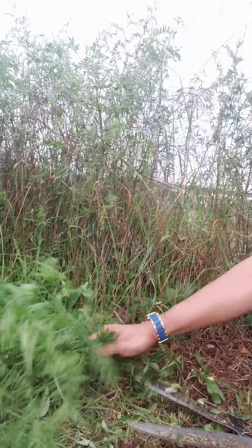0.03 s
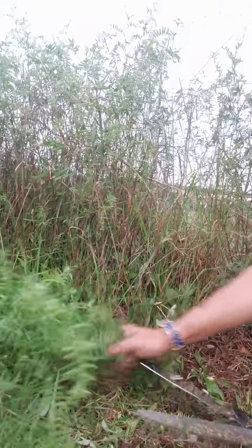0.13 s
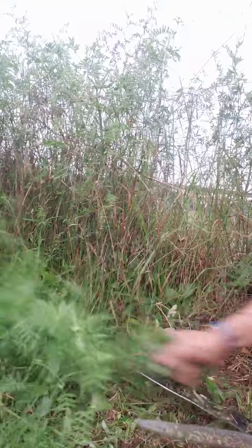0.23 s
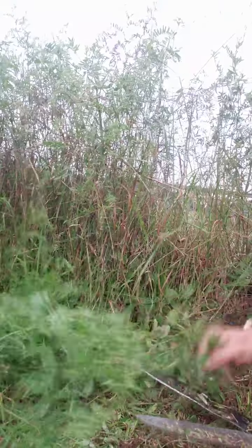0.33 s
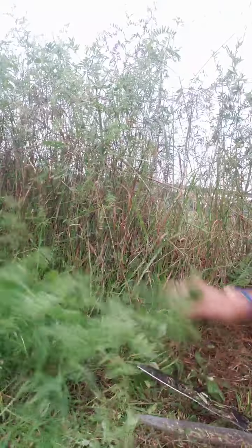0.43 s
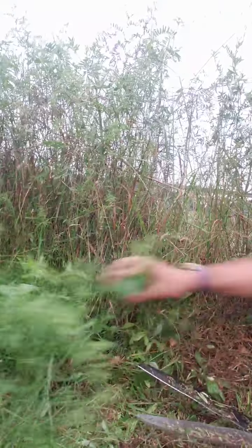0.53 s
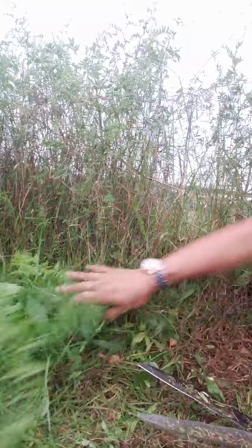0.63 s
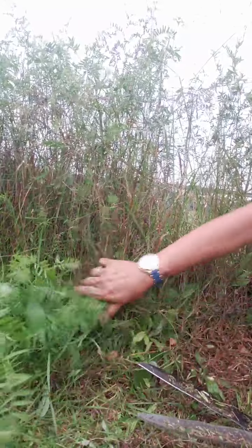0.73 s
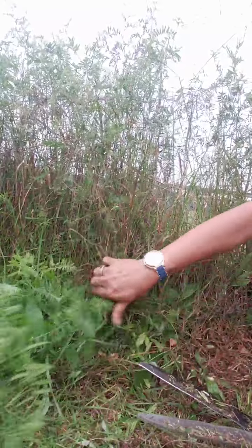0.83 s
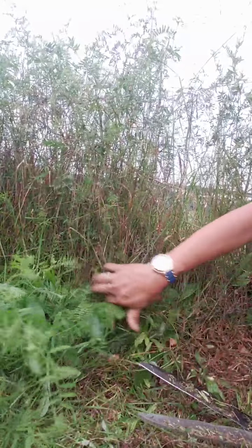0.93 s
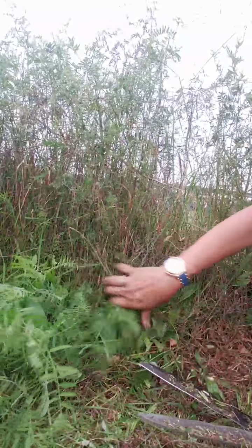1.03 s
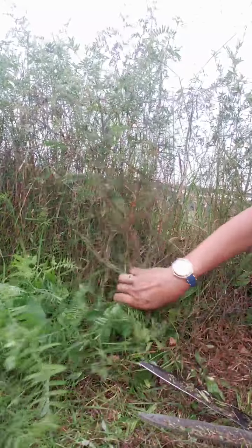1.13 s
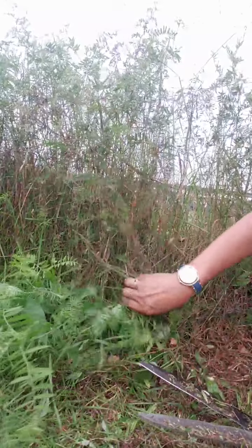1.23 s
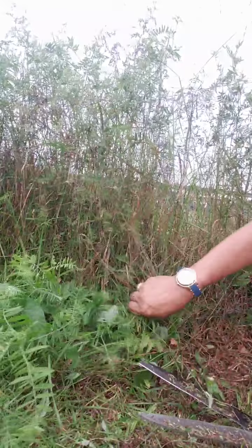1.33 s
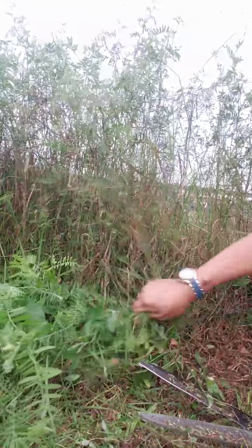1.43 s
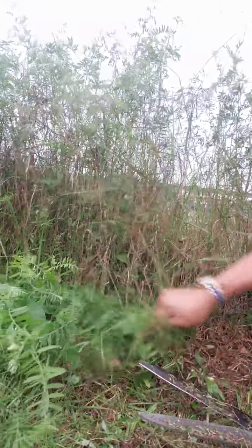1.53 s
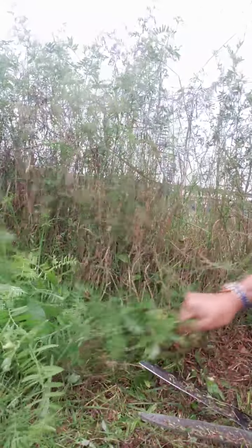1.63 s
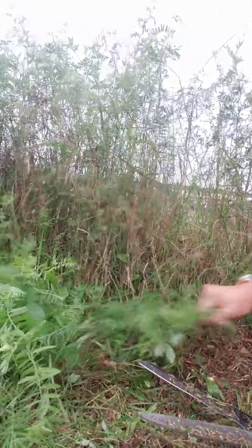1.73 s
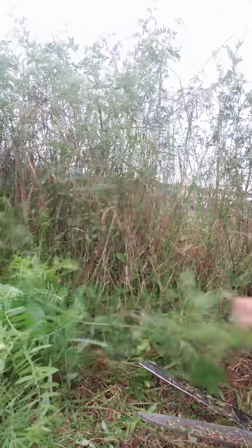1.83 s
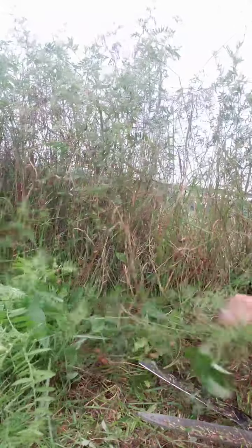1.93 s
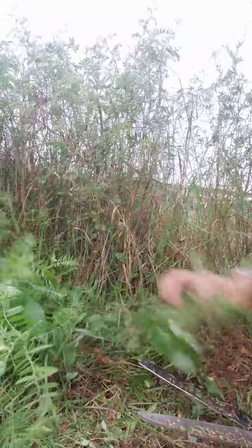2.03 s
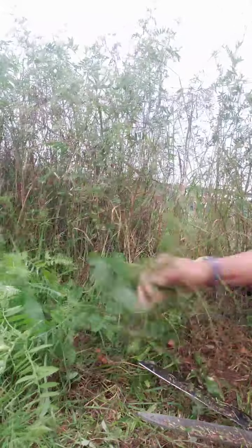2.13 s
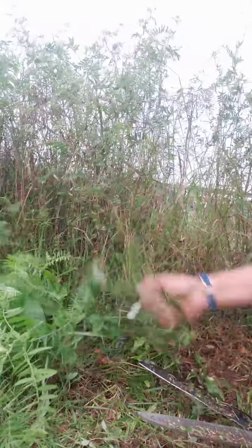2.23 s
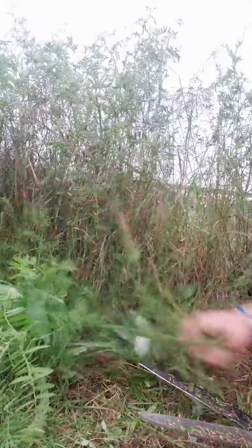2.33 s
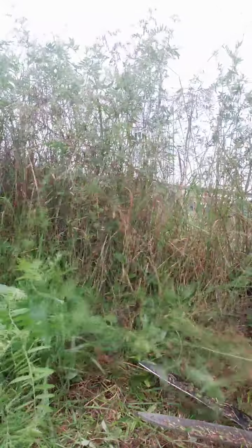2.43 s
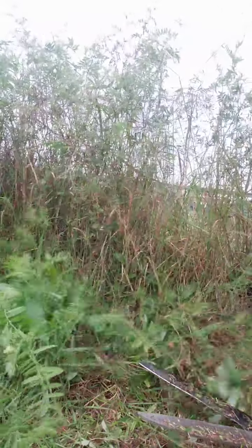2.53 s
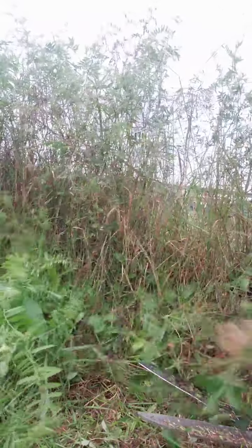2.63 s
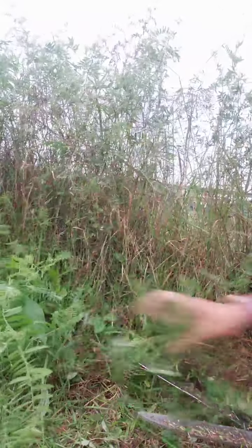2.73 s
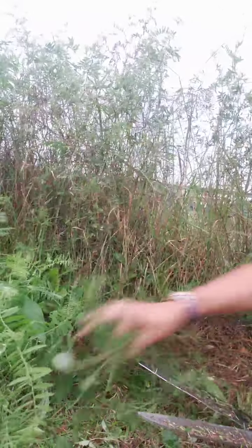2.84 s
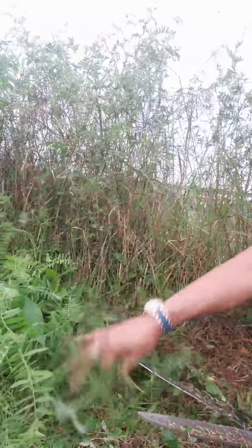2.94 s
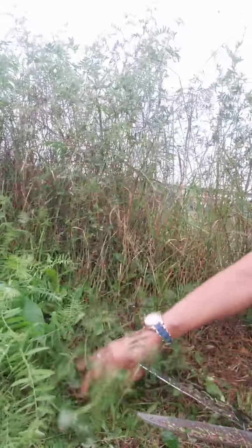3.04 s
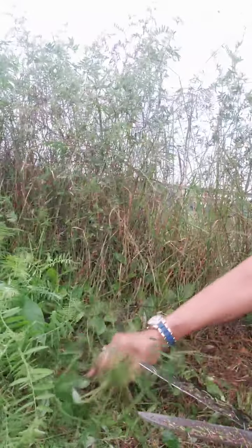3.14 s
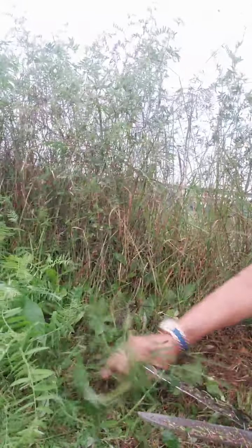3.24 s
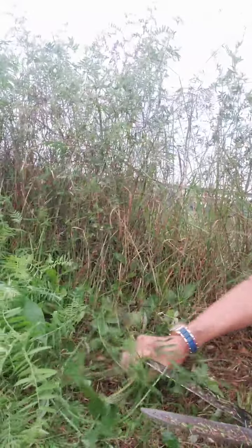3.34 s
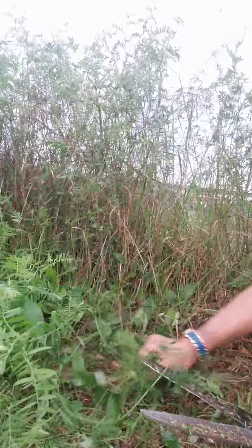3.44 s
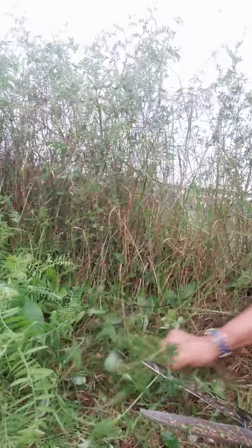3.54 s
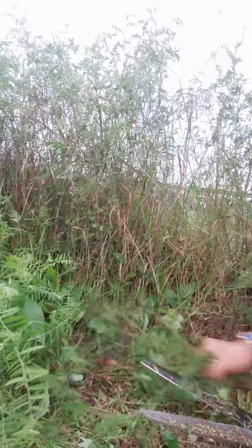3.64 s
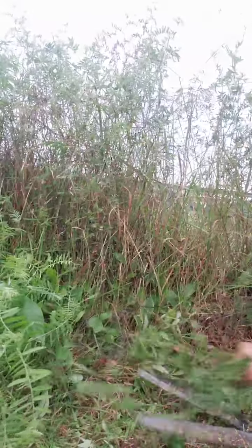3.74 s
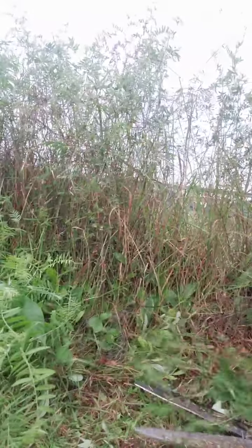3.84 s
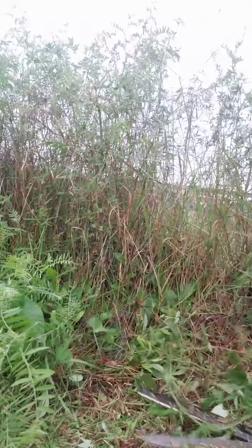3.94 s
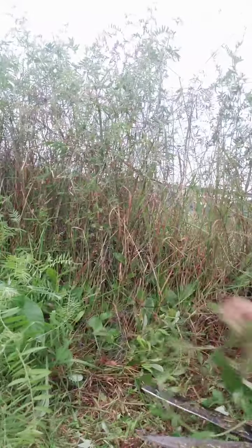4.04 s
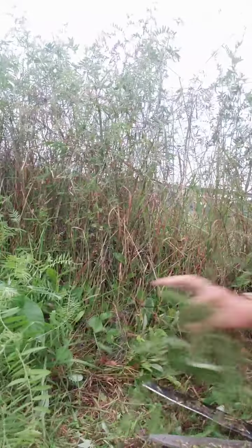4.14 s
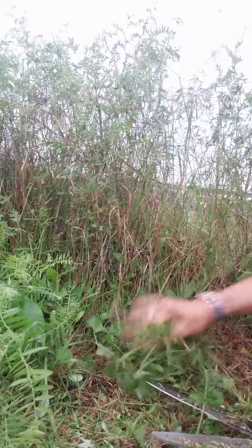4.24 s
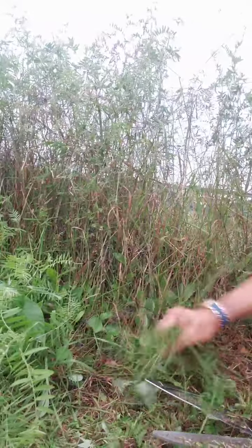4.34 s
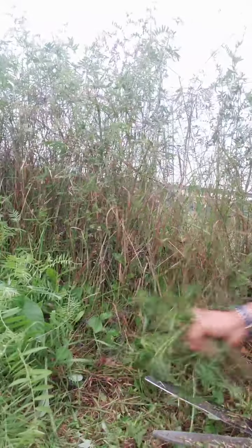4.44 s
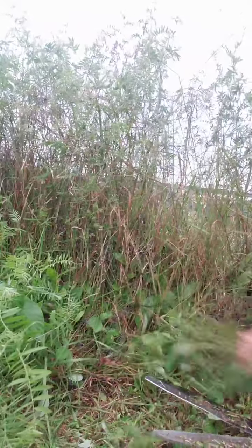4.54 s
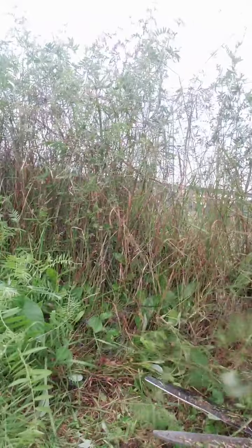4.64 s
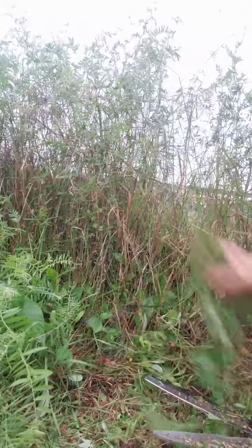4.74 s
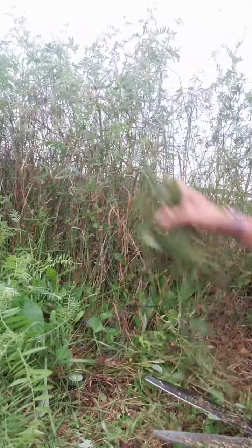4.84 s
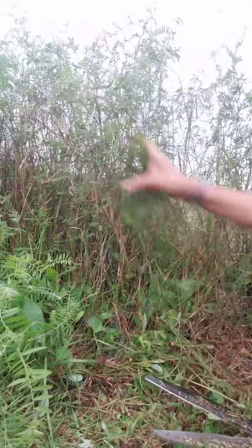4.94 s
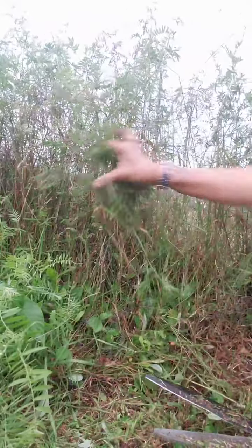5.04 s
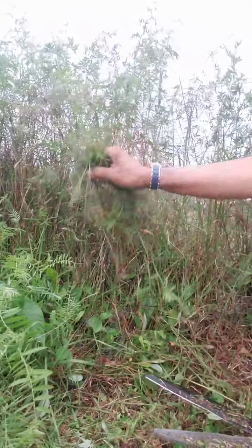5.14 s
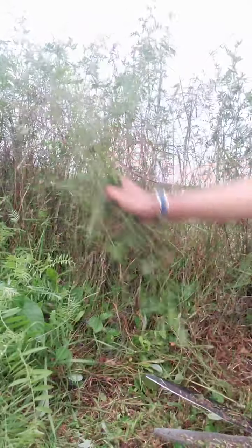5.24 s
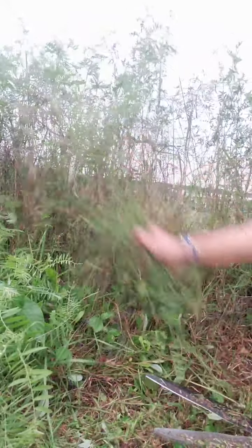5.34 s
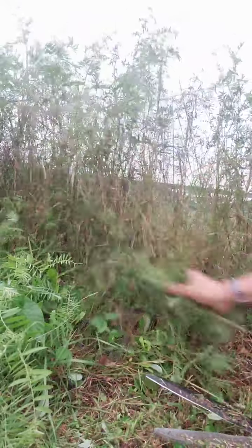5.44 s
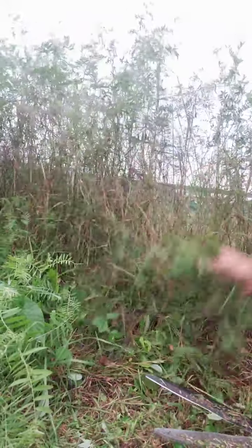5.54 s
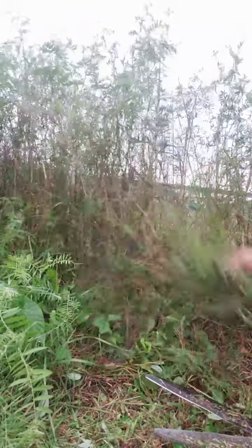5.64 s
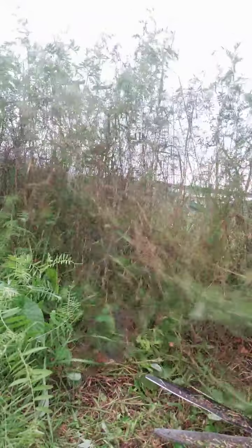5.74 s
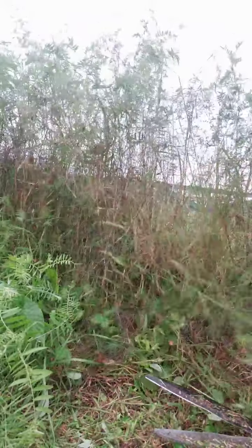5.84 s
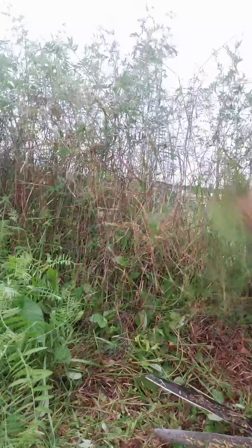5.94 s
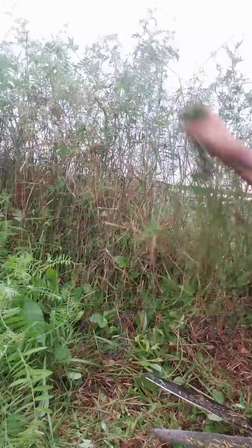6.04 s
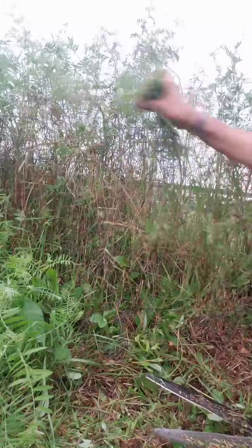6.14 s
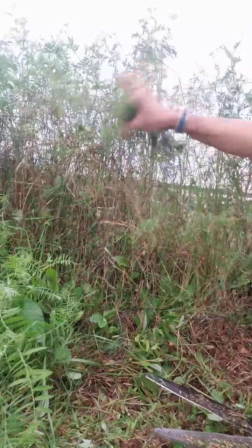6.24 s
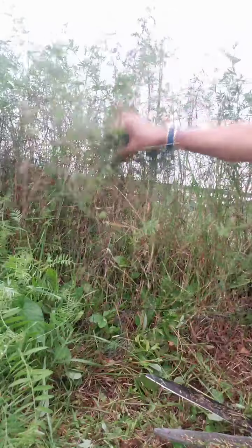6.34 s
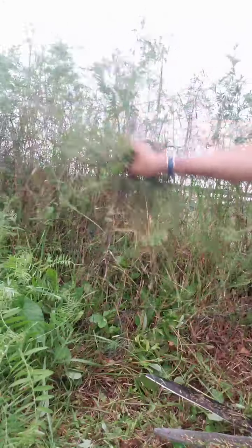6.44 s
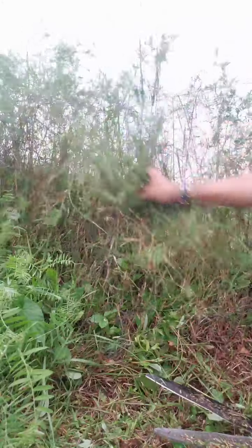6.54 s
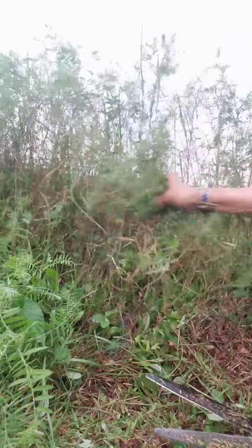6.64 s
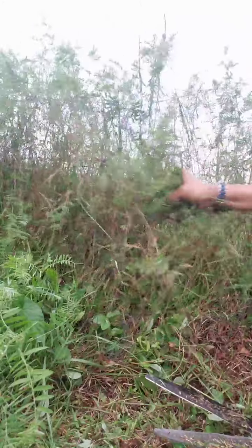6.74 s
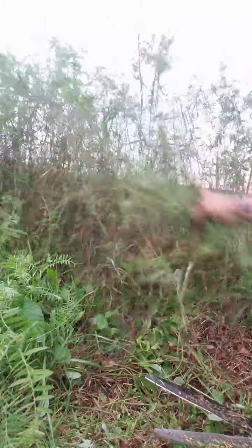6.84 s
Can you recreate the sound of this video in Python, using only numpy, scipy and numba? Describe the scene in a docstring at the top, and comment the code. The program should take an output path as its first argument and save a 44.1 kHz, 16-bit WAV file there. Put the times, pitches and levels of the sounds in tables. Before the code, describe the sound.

Weeds are ripped out by hand close to the microphone, with crisp bright leaf rustle, sharp stem snaps and short tearing bursts over faint outdoor hum.

```python
"""A hand tears weeds out of a garden bed close to a phone whose microphone makes leaves and cracks
bright in the top octave. After a moment of silence, stems snap, slip and rip over rustling leaves while
roots shake the soil. Bursts follow near 1.4-2.5, 3.3-4.0 and 4.5 s, the last with no tug; many hard snaps
come at 5.3-5.9 s, and a last tug with a slip ends it at 6.9 s. A mains hum and far traffic lie underneath.
Rustle is filtered noise grains, snaps are clicks with noise tails, slips are pulses ringing resonators."""
import sys
import numpy as np
from scipy import signal
from scipy.fft import rfft, irfft
from scipy.io import wavfile
from scipy.ndimage import uniform_filter1d
from numba import njit

SR = 44100
rng = np.random.default_rng(int(sys.argv[2]) if len(sys.argv) > 2 else 0)


def transcribe(u):
    """Save the signal u as a 16-bit wav file named by the first command-line argument.

    u: samples, shape (n,) or (channels, n), limited to [-1, 1]; the rate is SR.
    q: integer samples, one column per channel.
    """
    v = np.clip(np.atleast_2d(u).T, -1, 1)
    q = np.round(v * 32767).astype(np.int16)
    wavfile.write(sys.argv[1], SR, q)


N = 303496

# rubbing leaves as heard through a bright phone microphone with a steep top cutoff:
# freq_hz, gain_db (relative)
LEAF_COLOUR = [(2000, -64), (6000, -39.5), (8300, -35.5), (9400, -5.5), (10500, 0), (11400, 6), (14200, 7),
               (15600, 9), (15900, -51.5)]
# stalks and thin stems as heard through the microphone: freq_hz, gain_db (relative)
STALK_COLOUR = [(2000, -40.5), (3300, -18), (4300, -3.5), (5200, -6), (6100, 0.5), (7200, -6), (9000, -20)]
# ripping fibres as heard through the microphone: freq_hz, gain_db (relative)
FIBRE_COLOUR = [(400, -15.5), (1200, -14.5), (2100, -3.5), (2800, -4), (3400, -3), (6000, -36.5)]


def undb(db):
    """Amplitude ratio of a level in dB."""
    return 10 ** (np.asarray(db) / 20)


def level(x, db):
    """Scale to an RMS level in dB."""
    return x * undb(db) / np.sqrt(np.mean(x ** 2))


def peak(x, db):
    """Scale to a peak level in dB."""
    return x * undb(db) / np.abs(x).max()


def colour(x, points):
    """Causal minimum-phase filter with the given (Hz, dB) gain, from the cepstrum of the log gain."""
    hz, db = np.transpose(points)
    size = 4096
    log_grid = np.log(np.arange(size // 2 + 1) * SR / size + 1)
    gain_db = np.interp(log_grid, np.log(hz), db)
    cepstrum = irfft(np.log(undb(gain_db)), size)
    # fold onto positive time
    cepstrum[1:size // 2] *= 2
    cepstrum[size // 2 + 1:] = 0
    impulse = irfft(np.exp(rfft(cepstrum)), size)[:size // 2]
    return signal.fftconvolve(x, impulse)[:len(x)]


def walk(rate_hz):
    """Random levels held 1 / rate_hz and slewed twice; spread near 1."""
    hold = int(SR / rate_hz)
    steps = np.repeat(rng.standard_normal(N // hold + 1), hold)
    slewed = uniform_filter1d(uniform_filter1d(steps, hold), hold)
    return 1.31 * slewed[:N]


def garden():
    """Far traffic rumble and faint hiss, with a slightly wavering mains hum."""
    # rumble and hiss as heard: freq_hz, gain_db (relative)
    garden_colour = [(14, -44.5), (40, -3), (70, -2.5), (200, -8), (300, -11.5), (360, -23), (1000, -29.5),
                     (5000, -36), (8000, -54.5), (9200, -68), (10500, -69.5)]
    air_db, hum_hz, hum_db = -69.5, 119, -67
    air = level(colour(rng.standard_normal(N), garden_colour), air_db) * undb(1.0 * walk(2.85))
    cycles = hum_hz * np.cumsum(1 + .012 * walk(10)) / SR
    hum = np.sin(2 * np.pi * cycles) * undb(2.2 * walk(9))
    return air + level(hum, hum_db)


def tugs():
    """Each tug at the roots tightens fast, holds and loosens; fibre rip and soil rumble levels in dB."""
    # tugs: start_s, hold_s, fibre_rip_db, soil_rumble_db
    tug_table = [(0.161, 0.097, -66.5, -51.5), (1.42, 0.057, -80.5, -71), (1.545, .13, -69.5, -54),
                 (1.751, 0.14, -69.5, -59), (2.378, 0.021, -70, -59), (2.46, .12, -89, -67.5),
                 (3.3, 0.087, -91, -61.5), (3.415, 0.062, -73.5, -55.5), (3.52, 0.069, -78.5, -64),
                 (3.728, 0.071, -76.5, -66), (5.412, 0.093, -65.5, -63), (5.636, .03, -70.5, -64.5),
                 (5.729, 0.021, -64, -55), (6.554, 0.23, -79.5, -71), (6.86, .04, -82, -61)]
    tighten_db_per_s, loosen_db_per_s = 271, 176
    t = np.arange(N) / SR
    start, hold, fibre_db, soil_db = np.transpose(tug_table)[:, :, None]
    before_db = tighten_db_per_s * np.maximum(start - t, 0)
    after_db = loosen_db_per_s * np.maximum(t - start - hold, 0)
    slack_db = before_db + after_db
    return (fibre_db - slack_db).max(axis=0), (soil_db - slack_db).max(axis=0)


def soil(soil_db):
    """Roots shake the soil: low filtered noise that follows the tugs."""
    # soil rumble as heard: freq_hz, gain_db (relative)
    soil_colour = [(15, -41), (70, 1.5), (110, 3.5), (190, -2.5), (300, -13), (600, -23.5), (1300, -27.5),
                   (2500, -52)]
    return level(colour(rng.standard_normal(N), soil_colour), 0) * undb(soil_db)


def brushing():
    """Leaf level in dB as the hand brushes, straight lines between points."""
    # brushing of the hand: time_s, leaf_rustle_db
    brush_table = [(0.0, -51.5), (0.07, -42), (0.229, -39.5), (0.501, -59.5), (0.65, -57), (0.92, -65.5),
                   (1.36, -50), (1.639, -41.5), (1.88, -39.5), (1.95, -62.5), (2.029, -55), (2.2, -62.5),
                   (2.329, -54.5), (2.385, -44), (2.469, -49.5), (2.85, -60), (3.16, -60), (3.309, -50),
                   (3.4, -52), (3.47, -45), (3.772, -46.5), (3.888, -59), (4.0, -51.5), (4.081, -65.5),
                   (4.33, -56.5), (4.491, -44.5), (4.6, -55), (5.04, -52.5), (5.219, -54), (5.401, -43),
                   (5.61, -53.5), (5.75, -40.5), (5.88, -51), (6.168, -52), (6.299, -64), (6.53, -43),
                   (6.66, -43), (6.79, -51), (6.88, -34.5)]
    return np.interp(np.arange(N) / SR, *np.transpose(brush_table))


def stalk_scrape(leaf_db, fibre_db):
    """Stalk level in dB: scraped by the brushing hand or dragged by a tug, whichever is louder."""
    brushed_db = -74 + 1.384 * (leaf_db + 50)  # -74 dB when leaves are at -50 dB
    dragged_db = fibre_db + 5
    return np.maximum(brushed_db, dragged_db)


def grains(rate_per_s, spread_db, tail_s, bed, top_db=14):
    """Random contacts, a few louder than the rest, each a short dying puff of noise over a finer bed."""
    chance, noise = rng.random((2, N)), rng.standard_normal(N)
    excess_db = np.minimum(-spread_db * np.log(1 - chance[1]), top_db)
    hits = (chance[0] < rate_per_s / SR) * undb(excess_db) ** 2
    power = signal.lfilter([1], [1, -np.exp(-1 / (tail_s * SR))], hits)
    return noise * np.sqrt(power / power.mean() + bed)


def rustle(leaf_db, stalk_db, fibre_db):
    """Leaves, stalks and fibres rub in the same contacts, so their grains partly coincide."""
    shared = grains(260, 3.0, 0.0013, 1.0)
    patchy = undb(2.9 * walk(45))
    stalk_grains = shared + 0.63 * grains(190, 6.3, 0.0008, 0.5)
    fibre_grains = 0.33 * shared + grains(200, 1.1, 0.00081, 0.78)
    leaf = level(colour(shared, LEAF_COLOUR), 0) * undb(leaf_db)
    stalk = level(colour(stalk_grains, STALK_COLOUR), 0) * undb(stalk_db)
    fibre = level(colour(fibre_grains, FIBRE_COLOUR), 0) * undb(fibre_db)
    return patchy * (leaf + stalk + fibre)


@njit
def resonate(x, hz, sharpness):
    """State-variable band-pass whose centre moves, gain 1 at the centre."""
    y, band, low = np.empty(len(x)), 0., 0.
    for i in range(len(x)):
        g = np.tan(np.pi * hz[i] / SR)
        v = (band + g * (x[i] - low)) / (1 + g * (g + 1 / sharpness))
        band, low, y[i] = 2 * v - band, low + 2 * g * v, v / sharpness
    return y


def slips(swell=0.35, stop_s=0.0068):
    """Stick-slip of stems: uneven pulses, mostly slowing, ring gliding resonances, then stop short."""
    # stems slipping through the fingers or out of the soil:
    # start_s, end_s, start_rate_per_s, end_rate_per_s, unevenness, sharpness (Q), gain_db,
    # rings [start_hz, end_hz, ring_db (relative)]
    slip_table = [(0.1, 0.16, 350.2, 252, 0.41, 7, -69, [(2570, 2400, -5.5), (4800, 4150, -4.5)]),
                  (0.185, 0.239, 508, 306.6, 0.38, 2.5, -61, [(4550, 3700, -10), (2200, 2630, -16),
                  (940, 680, -24)]), (1.52, 1.527, 700, 600, .3, 1.5, -78.5, [(610, 380, -13)]),
                  (1.58, 1.907, 450, 160, .09, 3.5, -66.5, [(493, 420, -9), (970, 630, -6.5),
                  (1620, 1300, -7), (2320, 1600, -2), (3800, 3400, -0.5), (6100, 3660, -4)]),
                  (3.426, 3.45, 405, 406, 0.27, 5, -79.5, [(1390, 1600, -15)]),
                  (3.761, 3.792, 503, 494, 0.27, 3.9, -76, [(1940, 2000, -18.5), (810, 760, -20.5)]),
                  (3.93, 3.984, 790, 780, .05, 8, -90.5, [(2440, 2230, 3), (1520, 1440, -7.5)]),
                  (6.808, 6.882, 404.3, 404, 0.42, 2.9, -70.5, [(1350, 1300, -13.5), (2820, 2570, -13.5),
                  (700, 870, -21)])]
    broad_db, bright_db = -21.5, 3  # relative to gain_db
    out, n = np.zeros(N + SR), SR // 2
    for start, end, rate0, rate1, uneven, sharpness, gain_db, rings in slip_table:
        length_s = end - start
        noise, drift = rng.standard_normal((2, n))
        along = np.minimum(np.arange(n) / SR / length_s, 1)
        wander = 1 + uneven * uniform_filter1d(drift, size=64) * np.sqrt(64)
        rate = (rate0 + (rate1 - rate0) * along ** 4.0) * wander
        slip_count = np.floor(np.cumsum(np.maximum(rate, 0)) / SR)
        pulses = np.diff(slip_count, prepend=0) * undb(3.7 * noise) + 0.1 * noise
        pulses *= np.clip(along / swell, 0, 1)
        pulses *= np.clip((1 - along) * length_s / stop_s, 0, 1)
        ring = 0
        for hz0, hz1, ring_db in rings:
            hz = hz0 + (hz1 - hz0) * along
            rung = resonate(resonate(pulses, hz, 1. * sharpness), hz, sharpness / 2)
            ring = ring + level(rung, ring_db)
        broad = level(colour(pulses, FIBRE_COLOUR), broad_db)
        bright = level(colour(pulses, LEAF_COLOUR), bright_db)
        # RMS was set over n samples; refer it to the slip's length
        body = (ring + broad + bright) * np.sqrt(n / SR / length_s)
        at = int(start * SR)
        out[at:at + n] += undb(gain_db) * body
    return out[:N]


def twigs(leaf_db, count=36):
    """Small snaps at random moments, more often and louder where the hand brushes hard."""
    top_db, scatter_db = 12, 3  # largest crack over the leaf level; how far each level may fall short
    thick_rel_db, thin_rel_db = -30, -15  # largest knocks relative to the crack
    busy = np.cumsum(undb(2 * leaf_db))
    when, size, thick, thin = rng.random((count, 4)).T
    at = np.searchsorted(busy, when * busy[-1])
    crack_db = leaf_db[at] + top_db - scatter_db * size
    thick_db = crack_db + thick_rel_db - scatter_db * thick
    thin_db = crack_db + thin_rel_db - scatter_db * thin
    return list(zip(at / SR, crack_db, thick_db, thin_db))


def snaps(leaf_db, crack_s=.0004, fray_s=0.0048, knock_s=0.0028):
    """A sharp crack, last fibres fraying after it, and a short knock in thick and thin parts of the stem."""
    # stems snapping: time_s, crack_peak_db, thick_knock_peak_db, thin_knock_peak_db
    snap_table = [(0.0398, -30.5, -55.5, -46), (0.071, -29, -59, -44), (0.095, -29, -70, -50),
                  (0.109, -36, -62.5, -34), (0.1235, -15, -39, -36), (0.146, -16, -52, -43),
                  (0.1538, -11, -50, -51), (0.1641, -23, -39, -34.5), (0.1783, -13, -45, -42),
                  (0.1882, -22, -40, -36), (0.1955, -17.5, -45, -37), (0.2143, -16, -33.5, -38),
                  (0.2723, -16, -55, -51), (0.278, -11, -48.5, -35), (1.412, -37, -62, -56),
                  (1.4652, -28, -57.5, -44), (1.4869, -22.5, -67, -47), (1.522, -20.5, -49, -35.5),
                  (1.5928, -14, -50, -28.5), (1.6098, -22, -47, -39), (1.646, -14, -43, -38),
                  (1.715, -26, -60, -45), (2.219, -23.5, -85, -53.5), (2.2365, -26, -79, -50.5),
                  (2.2623, -30.5, -75, -56), (2.369, -16.5, -51, -45), (2.3737, -12, -39, -28.5),
                  (2.431, -50, -69, -47), (3.256, -27, -80, -66), (3.327, -22.5, -62, -68),
                  (3.3804, -27, -52.5, -43), (3.396, -33, -64, -51), (3.406, -38, -61, -50),
                  (3.4223, -35, -70, -49), (3.4339, -28, -60, -41), (3.7318, -44, -57, -48),
                  (3.778, -32, -58, -44.5), (4.4547, -29, -74, -51), (4.4797, -22, -52.5, -30),
                  (4.56, -24.5, -70, -55), (4.5712, -47, -60, -53), (5.2867, -33.5, -77, -61),
                  (5.3248, -28.5, -54.5, -54), (5.388, -20.5, -47, -36.5), (5.4245, -19.5, -34.5, -28),
                  (5.4564, -21, -44, -32.5), (5.4868, -17, -51, -36.5), (5.5172, -28, -47, -38),
                  (5.5354, -43, -46.5, -57), (5.5742, -43, -47.5, -48), (5.6025, -14, -35, -33),
                  (5.6416, -33, -65, -56), (5.654, -12.5, -38, -28.5), (5.712, -10.5, -34, -27.5),
                  (5.7196, -13.5, -34, -31), (5.729, -29, -63, -46), (5.7357, -22, -63, -45),
                  (5.762, -18, -43, -34), (5.771, -17.5, -62, -39), (5.775, -23, -46, -44),
                  (6.4994, -24, -66, -55), (6.5419, -24, -72, -41.5), (6.554, -22, -73, -44),
                  (6.804, -33, -73, -55), (6.817, -23, -50, -39), (6.849, -16, -41, -36)]
    # crack as heard through the bright phone microphone: freq_hz, gain_db (relative)
    crack_colour = [(6500, -50), (8600, -23.5), (9600, -12), (11400, 0), (14000, 2), (16400, -24.5)]
    # thick part of a stem as heard through the microphone: freq_hz, gain_db (relative)
    thick_colour = [(400, -29), (1400, -21.5), (2000, -4.5), (2800, -2), (3400, -1.5), (6000, -35.5)]
    t = np.arange(1400) / SR
    out = np.zeros(N + len(t))
    for s, crack_db, thick_db, thin_db in list(snap_table) + twigs(leaf_db):
        noise, tearing, ragged = rng.standard_normal((3, len(t)))
        fray_db = -36 + 0.8532 * (crack_db + 25)  # RMS before its decay
        click = (t < 1 / SR) * 5.53
        crack = colour(click + noise * np.exp(-t / crack_s), crack_colour)
        tearing = tearing * undb(3.0 * uniform_filter1d(ragged, size=24) * np.sqrt(24))
        fray = level(colour(tearing, LEAF_COLOUR), fray_db) * np.exp(-t / fray_s)
        knock = click + .5 * tearing * np.exp(-t / knock_s)
        thick = peak(colour(knock, thick_colour), thick_db)
        thin = peak(colour(knock, STALK_COLOUR), thin_db)
        at = int(s * SR)
        out[at:at + len(t)] += peak(crack, crack_db) + fray + thick + thin
    return out[:N]


def scene():
    """Sum of all layers; brushing and tugs drive their levels."""
    leaf_db = brushing()
    fibre_db, soil_db = tugs()
    stalk_db = stalk_scrape(leaf_db, fibre_db)
    background = garden() + soil(soil_db)
    weeds = rustle(leaf_db, stalk_db, fibre_db) + slips() + snaps(leaf_db)
    return (background + weeds)[None]


def record(dry):
    """The phone opens after a moment of silence and cuts the top with a steep low-pass."""
    silence_s, fade_s, top_hz = .021, 0.0016, 16700
    opening = np.clip((np.arange(N) / SR - silence_s) / fade_s, 0, 1)
    low_pass = signal.ellip(8, .2, 70, top_hz, fs=SR, output="sos")
    return signal.sosfilt(low_pass, dry * opening)


dry = scene()
out = record(dry)
transcribe(out)
```